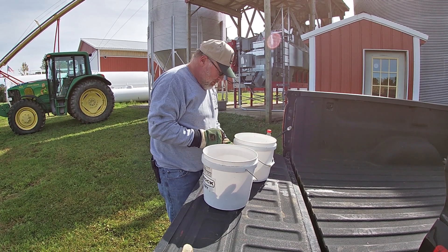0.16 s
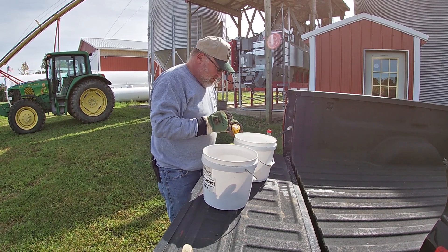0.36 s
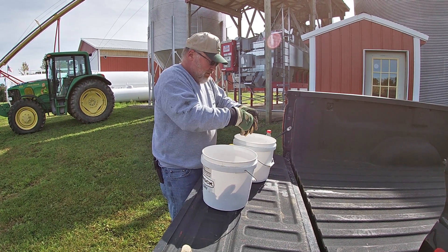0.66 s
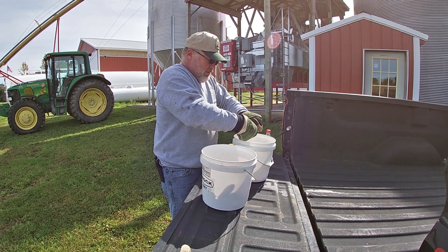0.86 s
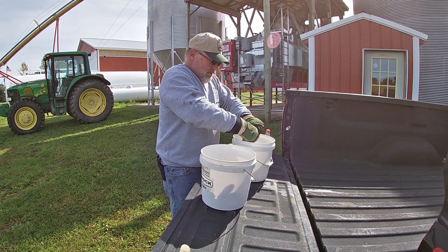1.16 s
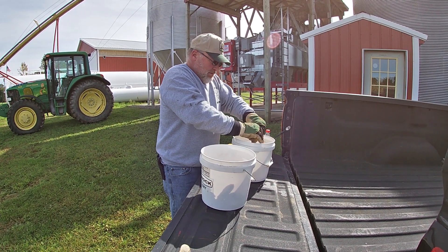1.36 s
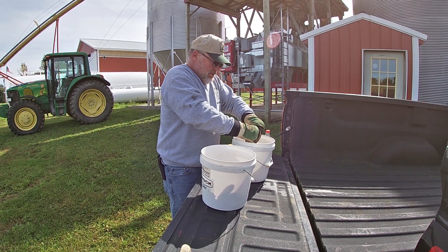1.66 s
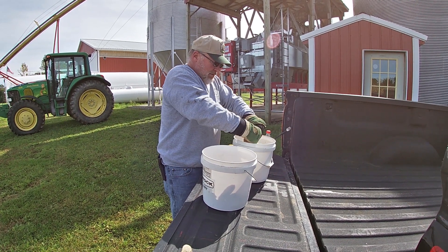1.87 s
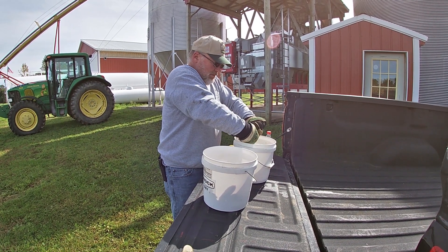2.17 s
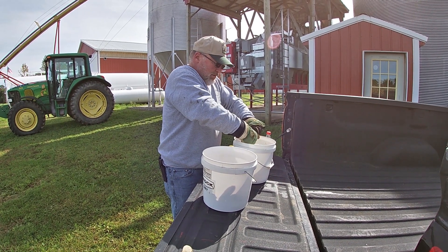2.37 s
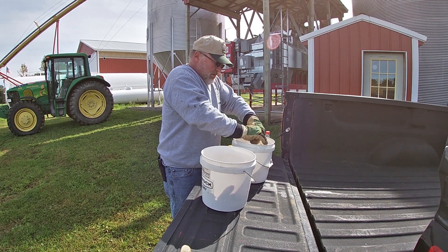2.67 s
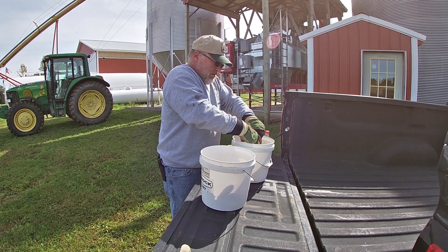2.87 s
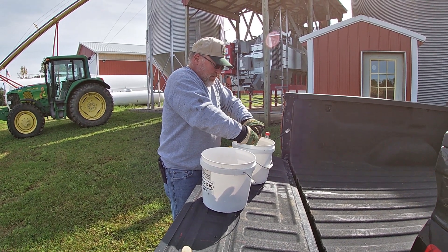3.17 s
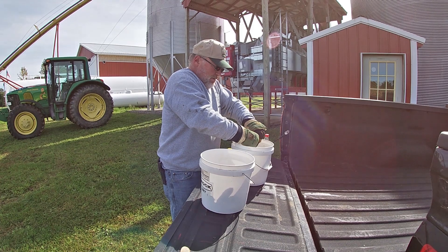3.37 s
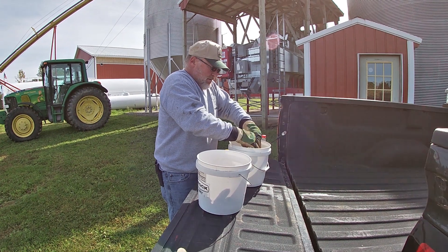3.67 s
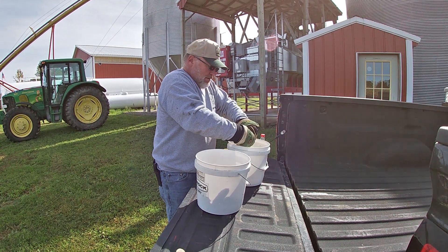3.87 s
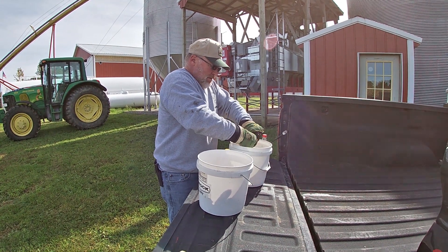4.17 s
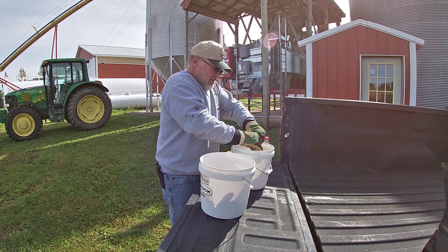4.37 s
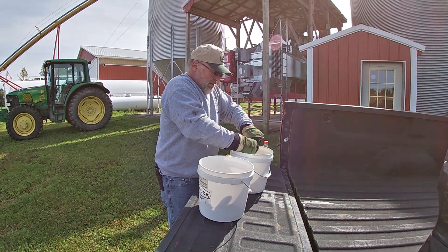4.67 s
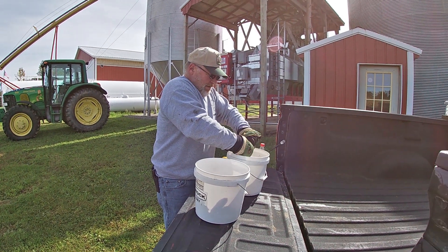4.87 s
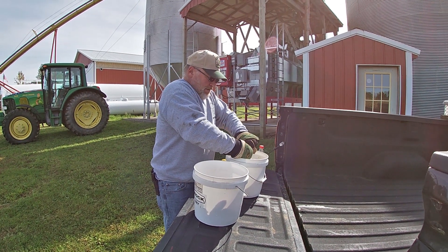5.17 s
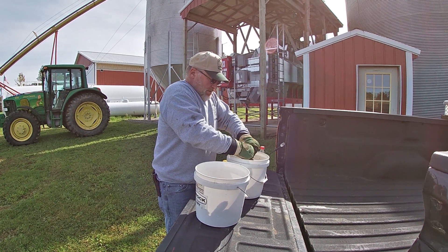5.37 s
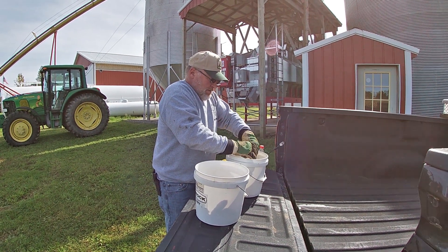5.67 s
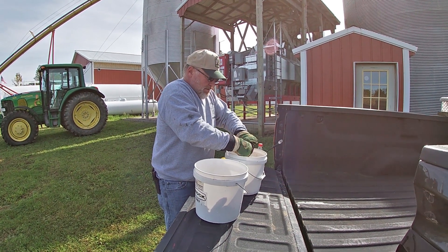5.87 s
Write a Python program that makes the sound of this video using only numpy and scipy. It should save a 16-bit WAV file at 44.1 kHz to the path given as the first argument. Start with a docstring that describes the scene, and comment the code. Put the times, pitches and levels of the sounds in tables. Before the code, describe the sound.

Quiet yard with light wind, then brittle corn crackling and hard kernels rattling loudly into a plastic bucket, with a far bird chirping.

```python
"""In a yard, gloved hands twist dry corn off a cob: the cob crackles, then kernels drop into a plastic bucket.
Strikes are filtered noise bursts with an echo; decaying modes make the bucket boom and its wall ring.
Random small strikes make the rattle; resonant noise makes the rubbed wall hum and the metal below rumble.
Around them: glove swish, light wind on a mono microphone, yard hiss, a soft knock near the start,
gliding tones for a far bird, and one low jolt of the microphone mount made of damped sines."""
import sys
import numpy as np
from scipy import signal
from scipy.io import wavfile
from scipy.ndimage import uniform_filter1d

SR = 44100
rng = np.random.default_rng(int(sys.argv[2]) if len(sys.argv) > 2 else 0)


def wav_record(signal):
    """Record a signal, one row per channel, as 16-bit PCM in the file named by sys.argv[1]."""
    frames = np.transpose(np.atleast_2d(signal))
    bounded = np.clip(frames, -1, 1)
    # unit amplitude maps onto the largest positive 16-bit level
    quanta = np.round(bounded * 32767).astype(np.int16)
    wavfile.write(sys.argv[1], SR, quanta)


N = 265261

# Modes of the bucket's air and base: pitch_hz, relative_level_db, t60_s
BOOM_MODES = [(182.1, -16, 0.51), (266.6, 7, 0.073), (310, 7.5, 0.072)]
# The hands at work all along: time_s, rattle_level_db, wall_hum_level_db
HAND_WORK = [(.45, -71, -85), (.92, -63.5, -85), (1.03, -75, -88), (1.2, -57.5, -58), (1.8, -63, -68.5),
             (2.1, -65.5, -80.5), (2.5, -50, -55.5), (3.25, -47, -50.5), (3.6, -56, -59.5),
             (4.3, -49.5, -51), (4.55, -59.5, -67.5), (4.9, -50, -61.5), (5.02, -66, -70.5),
             (5.5, -61, -58), (5.85, -60.5, -50.5)]
# The cob and chaff are drier than the bucket
CRACK = dict(snap_t60=0.004, tail_db=-22)


def gain_of(db):
    """Decibels to amplitude."""
    return 10 ** (np.asarray(db) / 20)


def evened(x):
    """Scales to rms 1."""
    return x / np.sqrt(np.mean(x ** 2) + 1e-20)


def along(rows, axis=1):
    """Reads one column of a curve at every sample; -120 before the first row."""
    table = np.transpose(rows)
    return np.interp(np.arange(N) / SR, table[0], table[axis], left=-120)


def noise_drift(length, window):
    """Noise smoothed over a window of samples, rms 1: a slow random wander."""
    return evened(uniform_filter1d(rng.standard_normal(length), window))


def coloured(x, points):
    """Minimum-phase filter whose spectrum follows the given points, floored at -100 dB."""
    point_hz, point_db = np.transpose(points)
    hz = np.abs(np.fft.fftfreq(8192, 1 / SR))
    gain_db = np.interp(np.log(hz + 1), np.log(point_hz), point_db)
    log_gain = np.log(gain_of(np.maximum(gain_db, -100)))
    # The Hilbert transform of the log gain supplies the causal phase
    taps = np.fft.ifft(np.exp(np.conj(signal.hilbert(log_gain)))).real[:4096]
    return signal.oaconvolve(x, taps)[:len(x)]


def resonate(x, hz, width):
    """Two-pole resonance of gain about 1; the width in Hz sets its damping."""
    r = np.exp(-np.pi * width / SR)
    return signal.lfilter([1 - r, 0, r - 1], [1, -2 * r * np.cos(2 * np.pi * hz / SR), r * r], x)


def ring(modes, chance=np.zeros(8), detune=0):
    """Response of dying modes to one tap, peak 1; a bucket is too small to radiate deep bass."""
    mode_spread_db = 3  # where a strike lands decides how much each mode answers
    t = np.arange(SR // 6) / SR
    x = np.zeros(len(t))
    for (hz, db, t60), level_chance, pitch_chance in zip(modes, chance, chance[::-1]):
        decay = gain_of(db + mode_spread_db * level_chance - 60 * t / t60)
        x += decay * np.sin(2 * np.pi * hz * (1 + detune * pitch_chance) * t)
    x = signal.sosfilt(signal.butter(5, 160, "high", fs=SR, output="sos"), x)
    return x / abs(x).max()


def add(mix, s, sound):
    """Mixes a sound in at s seconds."""
    part = mix[round(s * SR):][:len(sound)]
    part += sound[:len(part)]


def burst(noise, hz, snap_t60=0.021, tail_db=-6, force_db=-30):
    """One dry strike, peak about 1: a snap, its scattered tail and an echo, with emphasis near hz."""
    # Colour of a dry strike: frequency_hz, gain_db
    strike_colour = [(520, -37.5), (1000, -8), (1450, -5.5), (3700, -2.5), (5500, -4.5), (6800, -12),
                     (8700, -32), (10000, -34), (13500, -57), (15500, -86)]
    # Modes of the rim: pitch_hz, relative_level_db, t60_s
    rim_modes = [(1840, 12, 0.045), (2680, 7, 0.03), (3700, 11, 0.03), (4830, 9, 0.03)]
    slap_s, slap_db = 0.00996, -14  # echo off the nearby metal panel
    tail_t60, tail_rise = 0.092, 0.0019  # seconds
    rim_db, pitch_db = -12, -4  # against the body of the strike
    edge_db, edge_per_db = -1, 0.44  # treble edge at full force, and its gain per dB of force

    t = np.arange(len(noise)) / SR
    snap = np.minimum(t / 0.00035, 1) * gain_of(-60 * t / snap_t60)
    echo = gain_of(slap_db) * np.interp(t - slap_s, t, snap, left=0)
    tail = gain_of(tail_db - 60 * t / tail_t60) * np.minimum(t / tail_rise, 1)
    x = noise * (snap + echo + tail)
    rim = signal.oaconvolve(x, ring(rim_modes, noise[-10:], 0.032))[:len(x)]
    pitch = resonate(x, hz, 0.38 * hz)
    x = evened(x) + gain_of(rim_db) * evened(rim) + gain_of(pitch_db) * evened(pitch)
    x = coloured(x, strike_colour)
    # A fourth difference brings out the extreme treble of harder strikes
    edge = np.convolve(x, [1, -4, 6, -4, 1], "same")
    x = x + gain_of(edge_db + edge_per_db * force_db) * edge
    return x / (3 * np.std(x[:200]))


def bucket(noise, modes):
    """A soft 3 ms scuff rings the modes in a mix and tuning of its own; peak about 1."""
    roughness = 0.3  # random unevenness of the ringing level (share)
    scuff = (np.abs(noise[:130]) + 5.75 * noise[130:260]) * np.hanning(130)
    x = signal.oaconvolve(scuff, ring(modes, noise[300:310], 0.02))[:6000]
    x = signal.sosfilt(signal.butter(4, 1.35 * modes[-1][0], fs=SR, output="sos"), x)
    x = x * np.minimum(np.arange(len(x)) / SR * modes[0][0], 1)  # swells over one slowest cycle
    unevenness = evened(signal.oaconvolve(noise[:6000], np.hanning(400), "same"))
    x = x * (1 + roughness * unevenness)
    return x / (2 * np.std(x[:900]))


def kernels():
    """Each clear kernel strike: a snap, the boom of the bucket and the ring of its wall."""
    # Kernels striking the bucket: start_s, peak_db, bucket_re_peak_db, brightest_pitch_hz
    kernel_hits = [(2.493, -7, -21.5, 4070), (2.776, -6, -32.5, 3100), (2.833, -7.5, -30, 4700),
                   (2.8768, -13, -26, 3470), (2.903, -10.5, -23, 3460), (2.9166, -10.5, -13.5, 1870),
                   (2.9923, -13.5, -21, 3260), (3.0192, -9, -13.5, 1770), (3.045, -7.5, -15.5, 3360),
                   (3.068, -8, -13.5, 1800), (3.0828, -7, -16, 1920), (3.099, -23, -19, 4700),
                   (3.115, -40, -7, 4470), (3.1327, -8.5, -14.5, 1920), (3.1536, -12.5, -14.5, 3700),
                   (3.2303, -27, -10.5, 2600), (3.2504, -16, -38, 4160), (3.2631, -20, -22, 2000),
                   (3.2987, -24.5, -16.5, 1920), (3.3962, -25, -42, 3660), (3.4239, -12, -15, 2310),
                   (3.4426, -13.5, -11.5, 4970), (3.5269, -26.5, -12.5, 2080), (3.5786, -12, -18.5, 1770),
                   (3.7657, -9.5, -18, 1880), (3.809, -6.5, -14, 4800), (3.8337, -14, -37, 1850),
                   (3.8734, -8.5, -20, 1870), (3.927, -7, -16, 3730), (3.9504, -9.5, -10, 4600),
                   (3.9686, -14, -32, 1960), (4.0064, -18.5, -19, 1980), (4.063, -20.5, -26, 3760),
                   (4.0786, -15, -13, 1850), (4.1166, -16, -22, 1960), (4.1651, -17, -12.5, 3940),
                   (4.2165, -18.5, -8.5, 1760), (4.2652, -29.5, -14, 1460), (4.35, -30, -19, 3050),
                   (4.599, -14, -18.5, 1800), (4.691, -24, -29, 2980), (5.0403, -18, -11, 3700),
                   (5.1271, -28, -21, 1770), (5.1932, -33, -4.5, 1600), (5.2298, -23, -11, 1720),
                   (5.244, -21.5, -16, 3940), (5.2865, -11.5, -60, 2100), (5.368, -22.5, -22, 1930),
                   (5.52, -10.5, -9.5, 4230), (5.5607, -12, -16.5, 4130), (5.598, -14.5, -21, 3900),
                   (5.6257, -12, -12, 2180), (5.6987, -9, -33, 3060), (5.7255, -25.5, -3, 1240),
                   (5.9242, -30, 1.5, 1390), (5.955, -9.5, -10, 2070), (6.0027, -13, -19, 3760)]
    # Modes of the bucket wall: pitch_hz, relative_level_db, t60_s
    wall_modes = [(770, 5, 0.065), (892, 9, 0.045), (1020, 5, 0.04), (1180, 2, 0.03), (1400, 2, 0.03)]
    hard_per_db = 0.36  # a kernel that barely moves the bucket hits something hard: force per lost dB
    wall_db = -1  # wall ring against the boom

    out, noise = np.zeros(N), rng.standard_normal((len(kernel_hits), SR // 6))
    for (s, db, bucket_db, hz), z in zip(kernel_hits, noise):
        force_db = db - 7.5 - hard_per_db * (bucket_db + 22)
        add(out, s, gain_of(db) * burst(z, hz, force_db=force_db))
        add(out, s, gain_of(db + bucket_db) * bucket(z[::-1], BOOM_MODES))
        add(out, s, gain_of(db + bucket_db + wall_db) * bucket(z[999:], wall_modes))
    return out


def crackles():
    """The cob cracks in the gloves, each time at another pitch, amid a clump of lesser cracks."""
    # The louder crackles of the cob: start_s, peak_db
    cob_cracks = [(1.159, -37.5), (1.211, -32.5), (1.233, -40.5), (1.248, -37), (1.289, -34.5),
                  (1.305, -38.5), (1.344, -35), (1.408, -45), (1.4288, -33.5), (1.5255, -34),
                  (1.571, -41.5), (1.65, -37), (1.667, -36), (1.69, -35), (1.763, -40), (1.785, -38),
                  (1.81, -34), (1.8384, -36), (1.846, -39.5), (1.893, -43), (1.9158, -38.5), (1.953, -48),
                  (1.9768, -36.5), (2.001, -37), (2.145, -40.5), (2.1819, -41.5), (2.3302, -37),
                  (2.3956, -35), (2.554, -29.5), (2.62, -29.5), (2.6868, -22.5), (3.007, -17.5),
                  (3.2236, -23), (3.782, -24), (3.868, -23), (4.302, -31.5), (4.4151, -37.5), (4.4613, -36),
                  (4.668, -33.5), (4.8218, -28.5), (4.843, -38), (4.874, -59), (4.902, -40), (4.918, -34.5),
                  (4.93, -35), (5.658, -31), (5.7516, -26.5), (5.8048, -30)]
    clump_s, clump_db = 0.006, -11  # spread of the lesser cracks in time, and their level

    out, noise = np.zeros(N), rng.standard_normal((len(cob_cracks), SR // 10))
    for (s, db), z in zip(cob_cracks, noise):
        hz = 2300 * np.exp(0.25 * z[0])
        add(out, s, gain_of(db) * burst(z, hz, **CRACK))
        lesser = burst(z[::-1], hz, **CRACK)
        for offset, size in z[1:11].reshape(-1, 2):
            lesser_gain = np.sign(size) * gain_of(db + clump_db + 2.7 * size)
            add(out, s + clump_s * offset, lesser_gain * lesser)
    return out


def showers():
    """Gain of the kernel showers: each swells at one pace to its peak and dies away at its own."""
    # Small kernels and chaff, one shower for each twist of the cob: peak_s, level_db, fall_db_per_s
    twists = [(2.71, -42, 402), (2.926, -23.5, 359), (3.096, -18.5, 178), (3.843, -25, 428),
              (3.979, -31, 137), (5.26, -41.5, 94), (5.65, -42.5, 89), (6.01, -28.5, 147)]
    rise_db_per_s = 302
    t = np.arange(N) / SR
    power = np.zeros(N)
    for s, db, fall in twists:
        drop_db = np.maximum(rise_db_per_s * (s - t), fall * (t - s))
        power += gain_of(db - drop_db) ** 2
    return np.sqrt(power)


def rattle():
    """Random small strikes of a dozen shapes; a few are large, showers more even; all boom a little."""
    rate_per_s, spread_db, boom_db = 900, 8, -30
    twist_s = 1.12  # the cob starts to crack

    struck = rng.random(N) < rate_per_s / SR
    size = gain_of(spread_db * np.minimum(rng.exponential(1, N), 3)) * struck
    from_hands = evened(size) * gain_of(along(HAND_WORK))
    from_showers = evened(np.sqrt(size)) * showers()  # the root makes the sizes more even
    size = np.hypot(from_hands, from_showers) * (np.arange(N) > twist_s * SR)

    shape, noise = rng.integers(0, 12, N), rng.standard_normal((12, SR // 10))
    strikes = np.zeros(N)
    for k, hz in enumerate(np.geomspace(1500, 5500, num=len(noise))):
        strike = burst(noise[k], hz, **CRACK)
        strikes += signal.oaconvolve(size * (shape == k), strike / np.linalg.norm(strike))[:N]
    taps = size * rng.choice([-1., 1.], N)
    return strikes + gain_of(boom_db) * signal.oaconvolve(taps, ring(BOOM_MODES))[:N]


def scrape():
    """Rubbing hands and sliding showers keep the bucket wall humming: noise through a resonance."""
    hz, width, shower_hum_db = 818, 202, -11  # Hz, Hz, dB against the shower
    hum = resonate(resonate(rng.standard_normal(N), hz, width), hz, width)
    gain = np.hypot(gain_of(along(HAND_WORK, axis=2)), gain_of(shower_hum_db) * showers())
    return gain * evened(hum)


def swish():
    """Gloves slide over husk and cob: soft noise in uneven patches."""
    # Colour of the rubbing gloves: frequency_hz, gain_db
    glove_colour = [(600, -35), (1300, 4), (2500, -4), (5000, -12), (7500, -18), (12000, -56)]
    swish_db, patch_db = -8.5, 6.2  # level against the hands' rattle, unevenness
    level_db = along(HAND_WORK) + swish_db + patch_db * noise_drift(N, 1500)
    return gain_of(level_db) * evened(coloured(rng.standard_normal(N), glove_colour))


def rumble():
    """Falling showers shake the metal tailgate under the bucket: low noise follows their gain."""
    # Colour of the shaken metal: frequency_hz, gain_db
    metal_colour = [(110, -12.5), (170, 33), (260, -11), (500, -72.5)]
    rumble_db = -17.5  # against the shower
    return gain_of(rumble_db) * showers() * evened(coloured(rng.standard_normal(N), metal_colour))


def jolt():
    """A jolt shakes the microphone mount: three low damped swings that fade out together."""
    # One row a mode: start_s, pitch_hz, level_before_sign_gain_db, signed_gain, t60_s
    mount_modes = [(3.855, 42, -20.5, -1, 0.064), (3.8691, 74, -4, 0.92, 0.06),
                   (3.879, 20.3, -8, -0.77, 0.36)]
    end_s = 3.935  # the mount settles
    out = np.zeros(N)
    for s, hz, db, sign, t60 in mount_modes:
        t = np.arange(0, end_s - s, 1 / SR)
        settle = np.clip((t[-1] - t) / 0.012, 0, 1)
        add(out, s, sign * gain_of(db - 60 * t / t60) * np.sin(2 * np.pi * hz * t) * settle)
    return out


def knock():
    """A soft knock: resonant noise swells, holds and fades, with a contact tick early in the swell."""
    # Resonances of the knock: pitch_hz, width_hz, relative_level_db
    knock_modes = [(120, 130, 7), (185, 45, -4), (369, 32, -1), (1050, 1200, -9.5)]
    start_s, level_db, rise_s = 0.084, -47, 0.037
    hold_s, fall_db_per_s = 0.11, 198  # the fade starts hold_s after the start

    z, t = rng.standard_normal(N), np.arange(N) / SR - start_s
    rings = np.zeros(N)
    for hz, width, db in knock_modes:
        rings += gain_of(db) * evened(resonate(resonate(z, hz, width), hz, width))
    fade_db = fall_db_per_s * np.maximum(t - hold_s, 0)
    out = np.clip(t / rise_s, 0, 1) * gain_of(level_db - fade_db) * evened(rings)
    add(out, 0.102, gain_of(-46) * burst(z[:SR // 6], 1800))
    return out


def bird():
    """Far gliding near-sine chirps that flutter in level and echo twice off the buildings."""
    # One table a chirp: time_s, pitch_hz, level_db
    chirps = [
        [(.378, 5750, -70), (.40, 5470, -67), (.45, 5300, -70), (.478, 5340, -61.5), (.51, 5860, -66)],
        [(1.83, 5500, -69), (1.875, 5000, -61), (1.895, 4630, -52)],
        [(1.93, 4980, -83), (2.02, 4000, -62)],
        [(5.82, 7250, -76), (5.91, 7500, -78)],
    ]
    out = np.zeros(N)
    for rows in chirps:
        s, hz, db = np.transpose(rows)
        t = np.arange(s[0], s[-1], 1 / SR)
        level_db = np.interp(t, s, db) + 3.3 * noise_drift(len(t), 250)
        tone = np.sin(2 * np.pi * np.cumsum(np.interp(t, s, hz)) / SR)
        # The root of 2 makes the level an rms level
        tone *= np.sqrt(2) * gain_of(level_db) * signal.windows.tukey(len(t), 0.3)
        for delay_s, echo_db in [(0, 0), (0.028, -6), (0.068, -7)]:
            add(out, s[0] + delay_s, gain_of(echo_db) * tone)
    return out


def wind():
    """Slightly lumpy low pressure on the microphone: deep noise that follows the gusts."""
    # Strength of the wind: time_s, level_db
    gusts = [(0, -58), (.3, -43.5), (.6, -60), (1.05, -61.5), (1.38, -53), (1.44, -39.5), (1.6, -44),
             (1.8, -47), (1.98, -53.5), (2.1, -48.5), (2.4, -58.5), (3.2, -61), (4.2, -63), (6.01, -61)]
    # Colour of the wind: frequency_hz, gain_db
    wind_colour = [(12, -16.5), (30, 4), (60, -6.5), (100, -17.5), (170, -26.5), (300, -72), (600, -100)]
    level_db = along(gusts) + 0.2 * noise_drift(N, 2500)
    return gain_of(level_db) * evened(coloured(rng.standard_normal(N), wind_colour))


def yard():
    """Steady far hiss and hum: coloured noise with a slight drift in level."""
    # Colour of the yard: frequency_hz, gain_db
    yard_colour = [(70, -21.5), (170, -1), (260, -12.5), (520, -26.5), (780, -11.5), (1150, -23.5),
                   (2000, -22.5), (5000, -21), (7200, -28.5), (9500, -43), (15500, -51)]
    level_db = -65.5 + 0.2 * noise_drift(N, 6000)
    return gain_of(level_db) * evened(coloured(rng.standard_normal(N), yard_colour))


def scene():
    """All sources reach one microphone, copied to both channels."""
    corn = kernels() + crackles() + rattle() + scrape() + swish() + rumble()
    mono = corn + jolt() + knock() + bird() + wind() + yard()
    return np.array([mono, mono])


def record(dry):
    """Band limit: a steep low-pass at 15.7 kHz."""
    low_pass = signal.firwin(511, 15700, window=("kaiser", 9), fs=SR)
    return signal.oaconvolve(dry, low_pass[None], "same")


dry = scene()
out = record(dry)
wav_record(out)
```